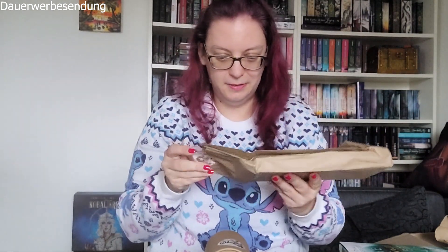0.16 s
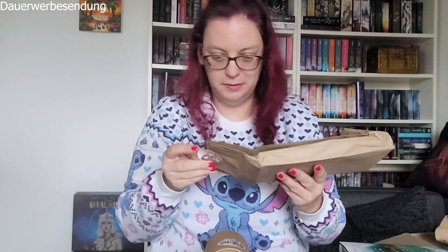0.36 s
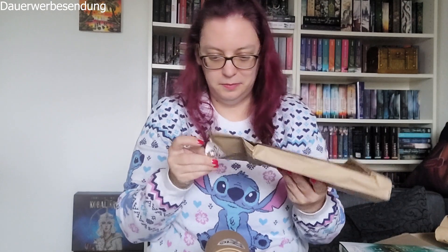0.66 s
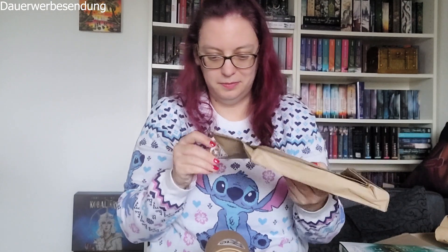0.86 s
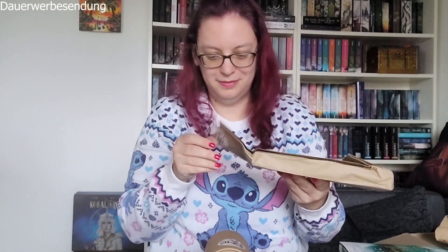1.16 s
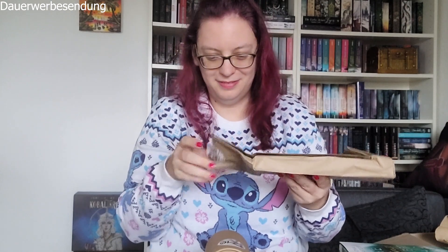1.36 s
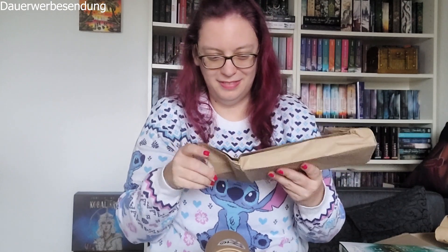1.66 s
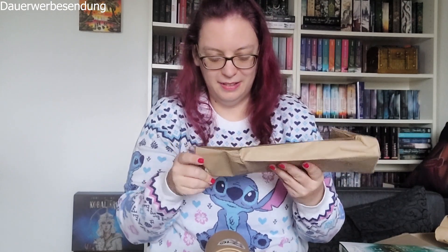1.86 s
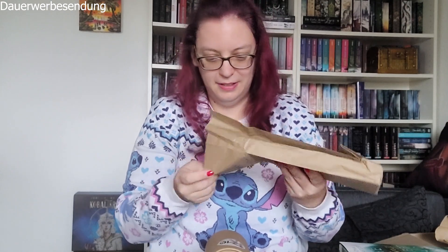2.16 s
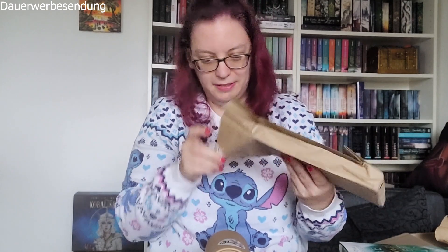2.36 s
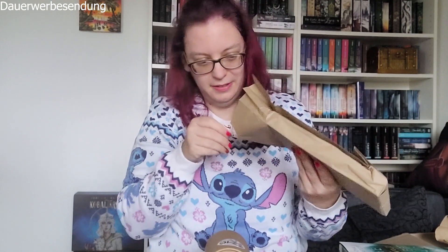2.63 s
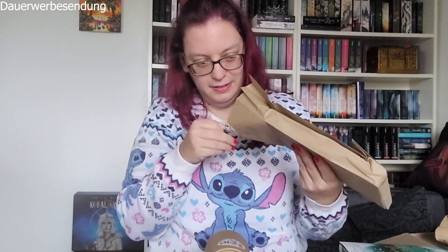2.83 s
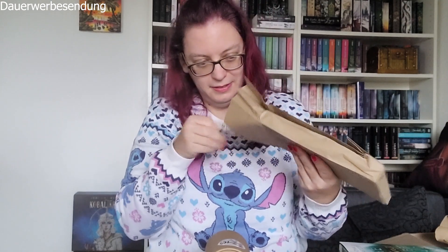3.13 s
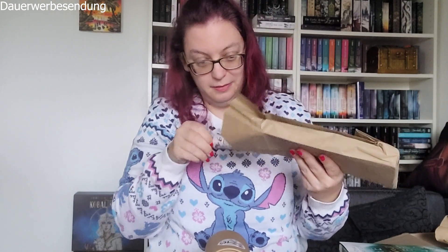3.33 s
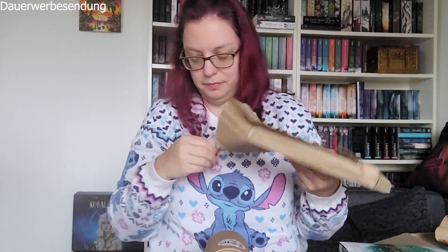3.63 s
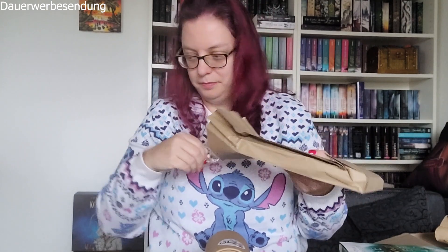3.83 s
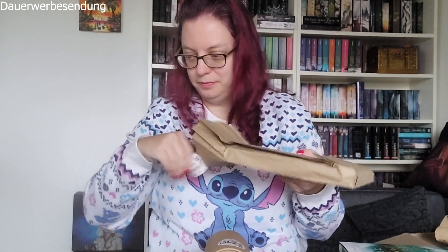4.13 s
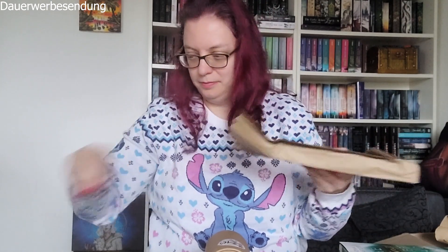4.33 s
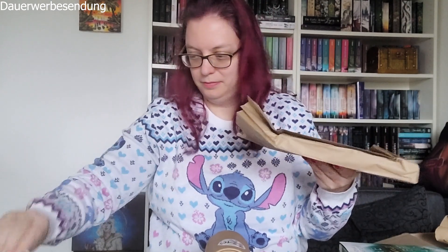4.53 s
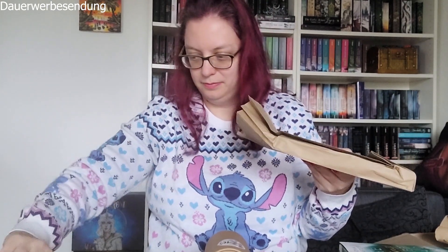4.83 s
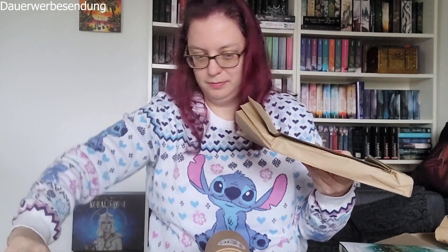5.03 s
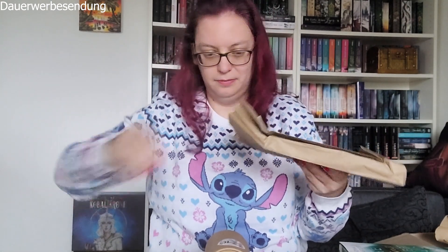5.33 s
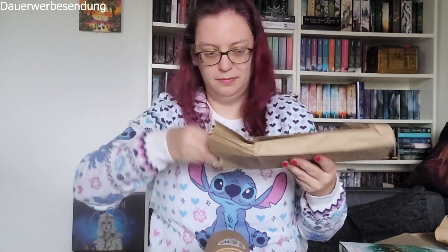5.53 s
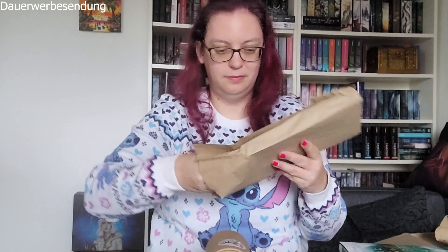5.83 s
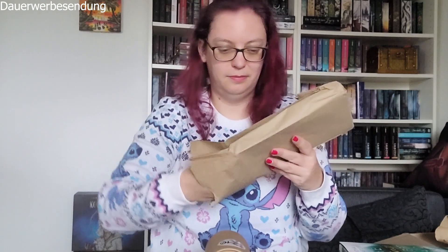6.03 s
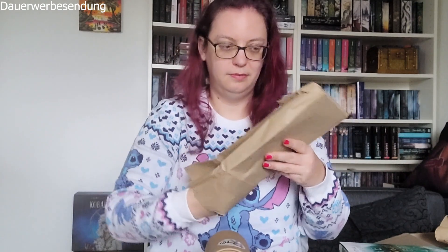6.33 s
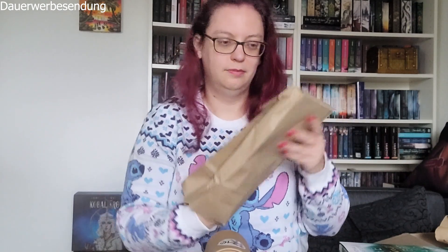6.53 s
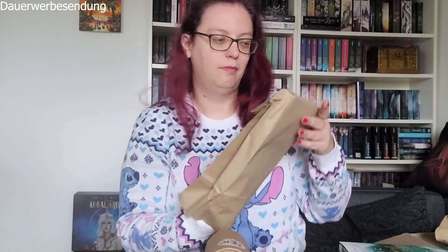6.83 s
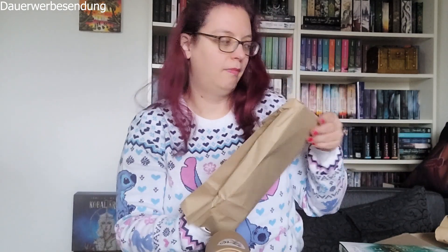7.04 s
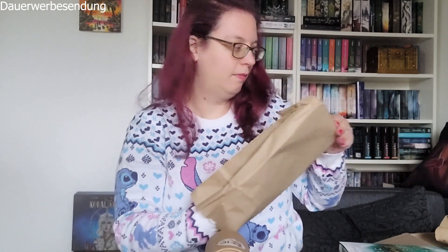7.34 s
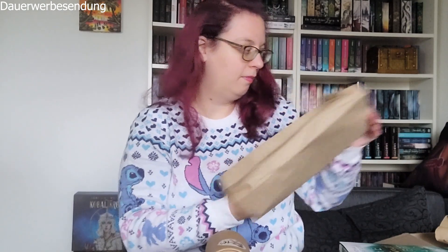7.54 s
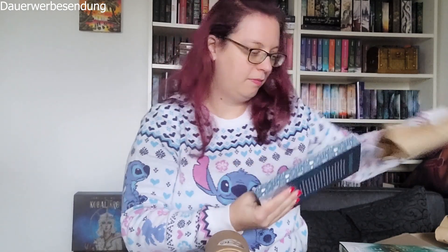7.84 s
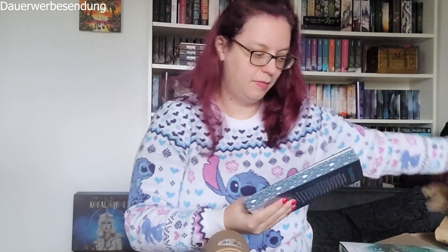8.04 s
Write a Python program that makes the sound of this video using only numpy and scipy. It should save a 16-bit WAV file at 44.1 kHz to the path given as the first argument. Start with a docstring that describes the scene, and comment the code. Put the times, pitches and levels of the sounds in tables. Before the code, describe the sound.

Close, dry crinkling of a heavy paper parcel being opened by hand in a small lively room, with sharp crease pops, dull bumps and a quiet gap.

```python
"""Opening a paper bag

A paper bag with a book inside is opened by hand in a small, lively room, and the book is pulled out.
Envelopes of the hand moves drive dense grains: fluttering walls, crackling sheet, fizzing fibres.
Noise bursts make snapping creases, small ticks and dull bumps; rapid slips excite gliding scrapes.
In a pause a sleeve brushes and something small lands, skitters and rings faintly.
Echo patterns with drifting shares form the room, over faint rumble and hiss."""
import sys
import numpy as np
from scipy import signal
from scipy.fft import rfft, irfft, next_fast_len
from scipy.io import wavfile
from scipy.ndimage import uniform_filter1d, map_coordinates

SR = 44100
rng = np.random.default_rng(int(sys.argv[2]) if len(sys.argv) > 2 else 0)


def wrap_up_sound(samples):
    """Save the sound to the file named by the first command line argument, as 16-bit audio."""
    columns = np.atleast_2d(samples).T
    # keep every value between -1 and 1, then stretch to whole-number steps
    tamed = np.clip(columns, -1, 1)
    steps = np.round(tamed * 32767).astype(np.int16)
    wavfile.write(sys.argv[1], SR, steps)


N = 361179

# All event and spectrum levels are relative: the mix sets the final gains.
# still room, spectrum: (frequency [Hz], level [dB])
QUIET_SPECTRUM = [(20, -9.5), (45, 2.5), (90, -7.5), (170, -12), (500, -20.5), (1000, -24), (2200, -26.5),
                  (4000, -29), (12000, -29.5), (16000, -39.5)]
# room decay: (frequency [Hz], T60 [s])
ROOM_T60 = [(100, 0.39), (300, 0.21), (700, 0.41), (2500, 0.4), (5500, 0.37), (8000, 0.34), (15000, 0.22)]
# left-right correlation of diffuse sound: (frequency [Hz], correlation [-1 to 1])
DIFFUSE_CORRELATION = [(100, 0.68), (280, 0.84), (500, 0.78), (1000, 0.083), (2500, -0.12), (8000, -.15)]
# sleeve brushes: (start [s], rise [s], hold [s], level [dB])
SLEEVE_BRUSHES = [(4.81, .065, .02, -74.5), (4.94, .08, 0.0685, -77)]
# sleeve, spectrum: (frequency [Hz], level [dB])
SLEEVE_SPECTRUM = [(59, -33), (100, -10), (249, -10.5), (433, -10), (535, -22.5), (854, -17), (2990, -25.5),
                   (6700, -13), (7450, -10), (9410, -20.5), (16000, -18.5)]
# small thing skittering, spectrum: (frequency [Hz], level [dB])
CLATTER_SPECTRUM = [(71, -38.5), (120, -10), (402, -9.5), (483, -19), (773, -5), (892, -15), (1720, -9.5),
                    (1830, -9), (2070, -11), (3310, -12.5), (3660, -10.5), (5870, -4), (8480, -9.5),
                    (15000, -8), (16000, -18.5)]
# soft, heavy contacts of hands and book: (time [s], level [dB], resonance [Hz])
SOFT_BUMPS = [(0.098, -46.0, 290), (0.729, -45.5, 240), (0.931, -56, 402), (1.039, -39.5, 300),
              (1.729, -34.5, 400), (1.893, -42, 250), (1.954, -31.5, 275), (2.122, -33.6, 240),
              (2.298, -37, 269), (2.522, -47, 400), (2.675, -63, 430), (2.745, -57.5, 420),
              (2.904, -40.5, 400), (2.939, -43.4, 250), (3.056, -47, 446), (3.694, -56.8, 520),
              (3.859, -60.1, 380), (3.941, -45, 444), (4.266, -37.5, 230), (4.864, -72.5, 450),
              (5.752, -44.5, 450), (5.904, -43.5, 418), (6.035, -45.9, 453), (6.771, -44.3, 330),
              (6.817, -31.5, 441), (6.944, -46, 260), (7.59, -33, 458), (7.774, -43.5, 216),
              (7.857, -50, 188)]
# rubbing strokes along the paper: (start [s], end [s], start pitch [Hz], end pitch [Hz], level [dB])
RUB_STROKES = [(0.99, 1.057, 3250, 3000, -60), (1.838, 1.919, 2460, 2100, -46),
               (2.127, 2.195, 2060, 1690, -37), (2.59, 2.83, 1550, 1560, -78.5),
               (2.863, 2.937, 1500, 1170, -54.5), (3.1, 3.212, 3900, 3470, -69),
               (3.325, 3.4, 1630, 1440, -67.5), (3.423, 3.525, 2390, 2130, -64),
               (3.927, 4.035, 1315, 2185, -58), (4.003, 4.054, 807, 830, -50),
               (6.017, 6.117, 2060, 1850, -50.5), (6.935, 6.965, 3300, 3900, -40.5),
               (7.602, 7.664, 2320, 2900, -40.5), (7.942, 8.044, 930, 1010, -53.5)]
# creases snapping through: (time [s], level over 2 ms [dB], tilt above resonance [dB/octave])
CREASE_SNAPS = [(0.0407, -34, -5), (0.1396, -42.5, -9.5), (0.1817, -33, -4), (0.411, -39.5, -2.5),
                (0.5206, -44, -10), (0.5815, -46, -13), (0.6688, -29.5, -3.5), (0.6796, -29.5, -2),
                (0.7414, -26, 2), (0.7552, -30, -5.5), (0.9339, -50.5, -8.5), (0.9738, -43.5, -9.5),
                (1.0021, -32, -3), (1.163, -46, 1.5), (1.416, -47, -2), (1.4874, -38.8, -9),
                (1.5629, -39.3, -3), (1.686, -37, -3.5), (1.73, -27.5, -4.5), (1.9559, -20.5, -3),
                (2.095, -30, -2.5), (2.2893, -33.5, -2), (2.303, -26.5, -6.5), (2.351, -33.5, -15.5),
                (2.865, -38, -4), (2.9089, -42.5, -8), (2.9271, -35, -2.5), (2.9344, -34.5, -2),
                (3.0587, -30.5, -11.5), (3.275, -55.5, -8.5), (3.4276, -47.5, -9.5), (3.5545, -43.5, -12.5),
                (3.5969, -31, -4.5), (3.9135, -49, -11.5), (3.941, -49, -10), (4.0073, -34, -9),
                (4.1182, -44, -4), (4.1662, -42.5, -0.4), (4.2261, -19.5, -4.5), (5.6998, -45.5, -9.5),
                (5.7492, -39.5, -11), (5.8001, -46, -4.5), (5.8604, -41, -7.5), (5.9082, -38, -10),
                (5.9664, -39.5, -9.5), (6.0022, -35.5, -9), (6.0254, -36.5, -8.5), (6.039, -33.5, -10.5),
                (6.1969, -41, -6.5), (6.2412, -39, -5.5), (6.3161, -32.5, -4.6), (6.407, -37, -6),
                (6.4319, -40.5, -6), (6.4812, -17.5, -2), (6.5539, -35.5, 0.5), (6.6202, -35.5, -10),
                (6.6819, -28, -4), (6.742, -35, -7.5), (6.819, -36, -7), (6.9466, -36.5, -11),
                (6.952, -37, -11), (6.9841, -34, -6.5), (7.1123, -42.5, -12), (7.2091, -42, -4),
                (7.2446, -39, -2), (7.2876, -38, -6.5), (7.4214, -32, -2.5), (7.5165, -26.5, -2.5),
                (7.542, -32.5, -5.5), (7.6059, -26.5, -4.7), (7.6271, -20, -5), (7.7818, -25.5, -7.5),
                (7.9532, -32.5, -3.5), (8.0587, -44.5, -9), (8.146, -35.5, -7)]
# hollow resonances of the bag: (frequency [Hz], width [Hz], level [dB])
BAG_MODES = [(253, 50, 3.5), (380, 72.4, 6), (434, 35, 6.5), (512.4, 30, 3), (624, 57, 0), (820, 190, -8)]
# bag walls, spectrum: (frequency [Hz], level [dB])
WALL_SPECTRUM = [(25, -24), (50, -15), (100, -7), (150, -3), (230, -12.5), (700, 0), (1100, 1.5),
                 (2500, -36.5)]
# crackling sheet, spectrum: (frequency [Hz], level [dB])
SHEET_SPECTRUM = [(200, -45), (550, -38.5), (900, -4.5), (1200, 5.5), (1900, 5.5), (3200, 7.5), (4800, 5),
                  (6200, 1.5), (9000, -15), (16000, -38)]
# rubbing fibres, spectrum: (frequency [Hz], level [dB])
FIBRE_SPECTRUM = [(2000, -42), (4500, 0.5), (6200, -3.5), (7300, 5.5), (8700, -4.5), (11500, 1.5),
                  (13000, -1), (15800, -5)]
# hand moves bending the bag:
# (start [s], rise [s], hold [s], wall flexing [dB], sheet crackle [dB], fibre fizz [dB])
HAND_MOVES = [(0.0, 0.0017, 0.062, -46.0, -43, -45.5), (0.134, 0.011, 0.114, -54, -54.5, -55.0),
              (0.397, 0.0091, 0.037, -56, -54.5, -59), (0.548, 0.042, 0.062, -51.5, -52, -60.5),
              (0.652, 0.022, 0.089, -40.5, -41.0, -37), (0.917, 0.013, 0.042, -49.5, -49.5, -67),
              (0.969, 0.022, 0.071, -47, -42, -46), (1.124, 0.044, 0.028, -57.5, -52, -56),
              (1.267, 0.021, 0.058, -63.5, -62.0, -62.5), (1.394, 0.01, 0.044, -65, -62.5, -56.5),
              (1.438, 0.032, 0.025, -51, -53.5, -58), (1.536, 0.016, 0.05, -49.5, -51, -54.5),
              (1.657, 0.041, 0.044, -40.5, -41, -39), (1.771, 0.043, 0.076, -38, -37.5, -40),
              (1.945, 0.016, 0.053, -42, -40, -43.0), (2.077, 0.056, 0.032, -30.5, -30, -33.5),
              (2.257, 0.038, 0.025, -33, -33, -40.5), (2.489, 0.014, 0.277, -67.5, -74.5, -69.5),
              (2.848, 0.03, 0.048, -47.5, -49, -65.0), (2.909, 0.023, 0.016, -42, -40, -43.5),
              (3.053, 0.004, 0.0086, -37.5, -40.5, -55.5), (3.124, 0.038, 0.096, -64.5, -62.5, -80),
              (3.265, 0.011, 0.36, -69.5, -74, -82.5), (3.418, 0.007, 0.039, -63, -75, -65),
              (3.593, 0.006, 0.011, -57, -55.5, -56.5), (3.67, 0.018, 0.168, -62.5, -66.5, -77),
              (3.813, 0.043, 0.066, -62, -64, -70.5), (3.894, 0.035, 0.066, -53.5, -55.5, -71),
              (3.996, 0.009, 0.024, -48.5, -44.5, -47), (4.095, 0.096, 0.02, -54, -46.5, -45.5),
              (4.183, 0.035, 0.043, -32, -26, -26), (4.283, 0.011, 0.052, -43.5, -37, -43),
              (5.607, 0.008, 0.051, -68, -69, -67), (5.641, 0.055, 0.12, -49.5, -49, -57.5),
              (5.83, 0.028, 0.266, -49, -51, -58.5), (5.982, 0.023, 0.029, -46.5, -43, -54.5),
              (6.171, 0.013, 0.147, -50.5, -51, -60), (6.378, 0.022, 0.037, -44.5, -42.5, -46.5),
              (6.458, 0.022, 0.212, -44.0, -42.5, -44.5), (6.691, 0.041, 0.052, -42.5, -44.5, -51.5),
              (6.809, 0.011, 0.031, -43, -41.5, -45.5), (6.876, 0.039, 0.063, -47.5, -44.5, -47.5),
              (7.068, 0.029, 0.096, -63, -60, -59.5), (7.197, 0.01, 0.107, -59, -47, -53),
              (7.35, 0.065, 0.09, -51.0, -44, -46), (7.499, 0.046, 0.039, -39.5, -31.5, -34.5),
              (7.562, 0.028, 0.06, -39.5, -33.0, -32.0), (7.645, 0.026, 0.14, -41, -38.0, -34.0),
              (7.814, 0.032, 0.041, -41, -39, -44.5), (7.934, 0.012, 0.13, -58, -50.5, -61),
              (8.137, 0.01, 0.05, -44.5, -39.5, -43.5)]

RELEASE_DB_PER_S, EASE_DB_PER_S = 329.5, 10  # settling after the hand stops; easing while held
JERK_DB, JERKS_PER_S = 1.5, 45  # the paper gives way unevenly
FACET_HZ = 2100  # lowest resonance of the patch of paper beside a crease
CRACK_T60_S = 0.009  # for a snap of -36.5 dB
SHOVE_DB = -36  # the bag's hollow answer against the snap
SCRAPE_WIDTH = 0.16  # fraction of the gliding pitch
LANDING_S, LANDING_RISE_S, LANDING_HOLD_S = 5.082, 0.0077, 0.025
LANDING_DB, SKITTER_DB_PER_S = -47, 450
TOP_HZ = 16000


def amp(db):
    """Decibels to gain."""
    return 10 ** (np.asarray(db) / 20)


def unit(x):
    """Scale to rms 1."""
    return x / np.sqrt(np.mean(x ** 2) + 1e-20)


def along(points, hz):
    """Read (frequency, value) points on a log frequency axis."""
    f, v = np.transpose(points)
    return np.interp(np.log(hz + 1), np.log(f + 1), v)


def filtered(x, response):
    """Apply a complex response of frequency, zero-padded."""
    n = x.shape[-1]
    m = next_fast_len(n + min(n, 8192), real=True)
    spectrum = rfft(x, m) * response(np.fft.rfftfreq(m, 1 / SR))
    return irfft(spectrum, m)[..., :n]


def coloured(x, spectrum, size=2048):
    """Minimum-phase filter with the given spectrum: causal, so attacks stay sharp."""
    gain = amp(along(spectrum, np.fft.rfftfreq(size, 1 / SR)))
    cepstrum = irfft(np.log(gain))
    cepstrum[1:size // 2] *= 2
    cepstrum[size // 2:] = 0
    impulse = irfft(np.exp(rfft(cepstrum)))
    return signal.oaconvolve(x, impulse[None], axes=1)[:, :N]


def diffuse(pair):
    """Mix two unrelated signals to a diffuse field: alike in the bass, apart in the treble."""
    def mid_side_gains(hz):
        turn = np.arccos(np.clip(along(DIFFUSE_CORRELATION, hz), -1, 1)) / 2
        return np.array([np.cos(turn), np.sin(turn)])
    mid, side = filtered(pair, mid_side_gains)
    return np.array([mid + side, mid - side])


def add(track, s, sound):
    """Mix a sound into a track at time s."""
    part = track[:, max(round(s * SR), 0):][:, :sound.shape[-1]]
    part += sound[..., :part.shape[-1]]


def wobble(knots_per_s):
    """Random curve, linear between normally distributed knots."""
    place = np.arange(N) * knots_per_s / SR
    return map_coordinates(rng.standard_normal(4000), [place], order=1, mode="wrap")


def stroke(rise_s, hold_s, release_db_per_s, stiffness=2.73):
    """Envelope of one movement: resistance, giving way, slight easing while held, settling."""
    t = np.arange(SR * 3 // 4) / SR
    swell = np.sin(np.pi / 2 * np.clip(t / rise_s, 0, 1)) ** stiffness
    ease_db = EASE_DB_PER_S * np.maximum(t - rise_s, 0)
    release_db = release_db_per_s * np.maximum(t - rise_s - hold_s, 0)
    return swell * amp(-ease_db - release_db)


def grains(rate_per_s, scatter_db, spread_s, steady_s):
    """Stereo train of tiny uneven slips, each from its own spot, with power near 1."""
    chance, size, spot = rng.random(N), rng.standard_normal(N), rng.standard_normal(N)
    push = (chance < rate_per_s / SR) * amp(scatter_db * np.clip(size, -2, 2))
    push *= rng.choice([-1, 1], N)
    local_power = uniform_filter1d(push ** 2, max(int(steady_s * SR), 1))
    push /= np.sqrt(np.abs(local_power) + 1e-6)
    at = np.flatnonzero(push)
    delay = np.round(spot[at] * spread_s * SR).astype(int)
    far = np.clip(at + delay, 0, N - 1)  # arrival in the right channel
    return np.array([push, np.bincount(far, push[at], N)])


def background():
    """Faint rumble and hiss of the still room: diffuse coloured noise."""
    return amp(-79.5) * unit(coloured(diffuse(rng.standard_normal((2, N))), QUIET_SPECTRUM))


def room(x, gap_s=0.0025, build_s=0.001, drift_per_s=22, count=4):
    """Walls answer after a short gap; parts of the moving bag feed different echo patterns."""
    shares = np.array([wobble(drift_per_s) for _ in range(count)])
    shares /= np.sqrt(np.sum(shares ** 2, axis=0))
    wet = np.zeros((2, N))
    for share in shares:
        hz, t, z = signal.stft(rng.standard_normal((2, SR // 2)), SR, nperseg=256)
        decay = amp(-60 * t / along(ROOM_T60, hz)[:, None])
        tail = signal.istft(z * decay, SR, nperseg=256)[1]
        age = np.maximum(np.arange(tail.shape[1]) / SR - gap_s, 0)
        tail = diffuse(tail * (1 - np.exp(-age / build_s)))
        tail *= np.sqrt(2) / np.linalg.norm(tail)
        wet += signal.oaconvolve(share * x[:1], tail, axes=1)[:, :N]
    return wet


def sleeve():
    """A sleeve brushes as the arm reaches out: coloured noise under movement envelopes."""
    brushing = np.zeros((1, N))
    for start, rise_s, hold_s, db in SLEEVE_BRUSHES:
        add(brushing, start, amp(db) * stroke(rise_s, hold_s, RELEASE_DB_PER_S))
    return brushing * unit(coloured(rng.standard_normal((2, N)), SLEEVE_SPECTRUM))


def landing(ring_hz=775, ring_t60_s=0.298, ring_db=-69):
    """A small thing lands and skitters in dense contacts; a decaying sine is its faint ring."""
    skitter = np.zeros((1, N))
    contacts = grains(rate_per_s=3000, scatter_db=2.5, spread_s=0.00018, steady_s=0.01)
    envelope = stroke(LANDING_RISE_S, LANDING_HOLD_S, SKITTER_DB_PER_S)
    add(skitter, LANDING_S, amp(LANDING_DB) * envelope)
    sound = skitter * unit(coloured(contacts, CLATTER_SPECTRUM))
    t = np.arange(SR // 2) / SR
    ring = amp(ring_db - 60 * t / ring_t60_s) * np.sin(2 * np.pi * ring_hz * t)
    add(sound, LANDING_S, ring)
    return sound


def bumps(t60_s=0.053, rise_s=0.002, sharpness=6.6):
    """A soft, heavy contact pushes a broad surface: a dull, short boom."""
    track = np.zeros((2, N))
    t = np.arange(SR // 8) / SR
    for s, db, pitch_hz in SOFT_BUMPS:
        def surface(hz):
            resonance = 1j * hz / (pitch_hz ** 2 - hz ** 2 + 1j * hz * pitch_hz / sharpness)
            return resonance / (1 + 1j * hz / 550) ** 3
        push = rng.standard_normal(len(t)) * amp(-60 * t / t60_s) * (1 - np.exp(-t / rise_s))
        boom = filtered(push, surface)
        boom = filtered(boom, lambda hz: 1j * hz / (170 + 1j * hz))  # thin wall: little bass
        add(track, s, amp(db - 12.5) * unit(boom))
    return track


def scrapes(size=256):
    """Rapid slips excite a gliding sheet resonance; each stroke starts fast and eases off."""
    track = np.zeros((2, N))
    slips = grains(rate_per_s=1700, scatter_db=6.0, spread_s=0.00003, steady_s=0.012)
    for start, end, from_hz, to_hz, db in RUB_STROKES:
        length = max(round((end - start) * SR), 2 * size)
        part = slips[:, round(start * SR):][:, :length]
        hz, t, z = signal.stft(part, SR, nperseg=size)
        glide_hz = np.geomspace(from_hz, to_hz, len(t))
        off = (hz[:, None] / glide_hz - 1) / (2 * SCRAPE_WIDTH)
        rub = signal.istft(z / (1 + off ** 2) ** 2, SR, nperseg=size)[1][:, :length]
        speed = signal.windows.tukey(length, 0.12) * amp(np.linspace(3, -6, length))
        add(track, start, amp(db) * unit(rub) * speed)
    return track


def facet(hz, pitch_hz, tilt_db, sharpness):
    """A patch of paper radiates from its lowest resonance upwards; tilt in dB/octave."""
    u = hz / pitch_hz
    resonance = u * u / (1 - u * u + 1j * u / sharpness)
    return resonance * amp(tilt_db * np.log2(np.maximum(u, 1)))


def ticks(crackling, count=640, pitch_hz=2600, spread=0.46, scatter_db=4.0, t60_s=0.006,
          tilt_db=-8, most_db=-39):
    """Small creases flip at random, each at its own pitch, louder with the crackle drive."""
    track = np.zeros((2, N))
    # a small crease can store only so much
    strain = np.minimum(uniform_filter1d(crackling, SR // 50), amp(most_db))
    t = np.arange(SR // 80) / SR
    places = rng.integers(0, N, count)
    draws = np.clip(rng.standard_normal((count, 2)), -2, 2)
    for at, (size, high) in zip(places, draws):
        common, side = rng.standard_normal((2, len(t))) * amp(-60 * t / t60_s)
        burst = np.array([common + 0.81 * side, common - 1.4 * side])
        own_hz = pitch_hz * np.exp(spread * high)
        tick = filtered(burst, lambda hz: facet(hz, own_hz, tilt_db, sharpness=1.6))
        add(track, at / SR, strain[at] * amp(scatter_db * size - 9.5) * unit(tick))
    return track


def hollow(x):
    """Air and walls of the bag ring briefly; white input keeps its power."""
    def ring(hz):
        total = 0
        for k, (centre, width, db) in enumerate(BAG_MODES):
            damping = 1j * hz * width
            mode = amp(db) * damping / (centre * centre - hz * hz + damping)
            total = total + (-1) ** k * mode  # alternating sign
        return total
    answer = filtered(signal.unit_impulse((1, SR // 8), (0, 0)), ring)
    answer = coloured(answer, WALL_SPECTRUM)
    return signal.oaconvolve(x, answer / np.linalg.norm(answer), axes=1)[:, :N]


def snaps(longer_per_db=-0.03, thump_t60_s=0.012, apart=0.91):
    """Each crease cracks, louder ones more briefly, and shoves the bag wall in proportion."""
    cracks, shoves = np.zeros((2, N)), np.zeros((2, N))
    t = np.arange(SR // 25) / SR
    for s, db, tilt_db in CREASE_SNAPS:
        common, side, push = rng.standard_normal((3, len(t)))
        life_s = CRACK_T60_S * np.exp(longer_per_db * (db + 36.5))
        burst = np.array([common + apart * side, common - apart * side]) * amp(-60 * t / life_s)
        burst = filtered(burst, lambda hz: facet(hz, FACET_HZ, tilt_db, sharpness=0.61))
        add(cracks, s, amp(db) * unit(burst) / np.sqrt(20))  # energy of 2 ms in 40 ms
        push = filtered(push * amp(-60 * t / thump_t60_s), lambda hz: 1 / (1 + (hz / 650) ** 4))
        add(shoves, s, amp(db) * unit(push) / np.sqrt(2))
    return amp(0.58) * cracks + amp(SHOVE_DB) * hollow(shoves)


def handling():
    """Flexing, crackle and fizz drive: hand moves add in power, with small jerks."""
    power = np.zeros((3, N))
    for start, rise_s, hold_s, *levels_db in HAND_MOVES:
        envelope = stroke(rise_s, hold_s, RELEASE_DB_PER_S)
        add(power, start, np.outer(amp(levels_db), envelope) ** 2)
    return np.sqrt(power) * amp(JERK_DB * wobble(JERKS_PER_S))


def bending(x, depth_db, width_hz, last_s, size=512):
    """As the sheet changes shape, patches of its spectrum swell and fade."""
    z = signal.stft(x, nperseg=size)[2]
    rows, cols = np.indices(z.shape[1:])
    across = np.sqrt(rows * SR / size / width_hz)  # patches widen with frequency
    over = cols * size / 2 / SR / last_s
    knots = rng.standard_normal((40, 1200))
    field = map_coordinates(knots, np.array([across, over]), order=1, mode="wrap")
    return signal.istft(z * amp(depth_db * field), nperseg=size)[1][:, :N]


def rustle(flexing, crackling, fizzing):
    """Bending paper: the walls flutter, small creases crackle, fibres rub."""
    flutter = grains(rate_per_s=500, scatter_db=3.5, spread_s=0.00002, steady_s=0.033)
    flex = amp(-4) * flexing * unit(hollow(flutter))
    crackle = grains(rate_per_s=950, scatter_db=2.5, spread_s=0.00005, steady_s=0.042)
    crackle = coloured(crackle, SHEET_SPECTRUM)
    crackle = bending(crackle, depth_db=3.0, width_hz=115.5, last_s=0.02)
    sheet = amp(-2) * crackling * unit(crackle)
    rubbing = grains(rate_per_s=4000, scatter_db=0.0, spread_s=0.00005, steady_s=0.039)
    fizz = amp(-1.5) * fizzing * unit(coloured(rubbing, FIBRE_SPECTRUM))
    return flex + sheet + fizz


def scene():
    """Paper close by, the small thing slightly more reverberant, all in one room."""
    flexing, crackling, fizzing = handling()
    paper = rustle(flexing, crackling, fizzing) + scrapes() + bumps()
    cracks = snaps() + ticks(crackling)
    small = sleeve() + landing()
    direct = amp(-1.0) * paper + cracks + small
    echo = room(amp(-2.5) * paper + amp(-2.0) * cracks + amp(-1.0) * small)
    balance = amp([[0.3], [-0.3]])  # left, right
    return (direct + echo) * balance + background()


def record(dry, low_cut_hz=36):
    """Band limit: the deepest bass rolls off, nothing passes from TOP_HZ up."""
    return filtered(dry, lambda hz: (hz < TOP_HZ) * hz ** 4 / (hz ** 4 + low_cut_hz ** 4))


dry = scene()
out = record(dry)
wrap_up_sound(out)
```